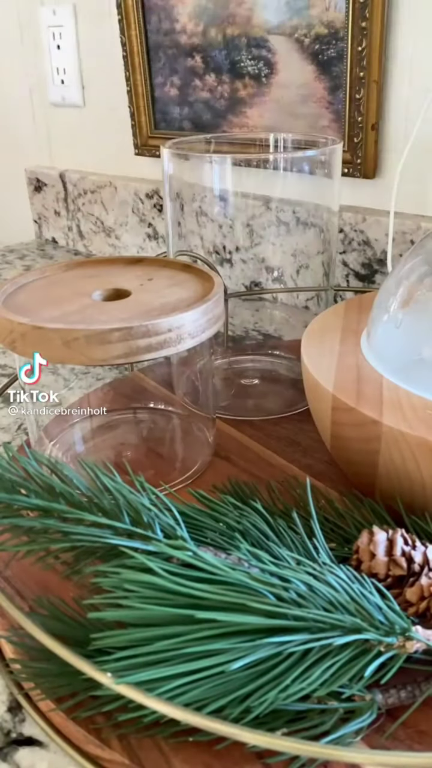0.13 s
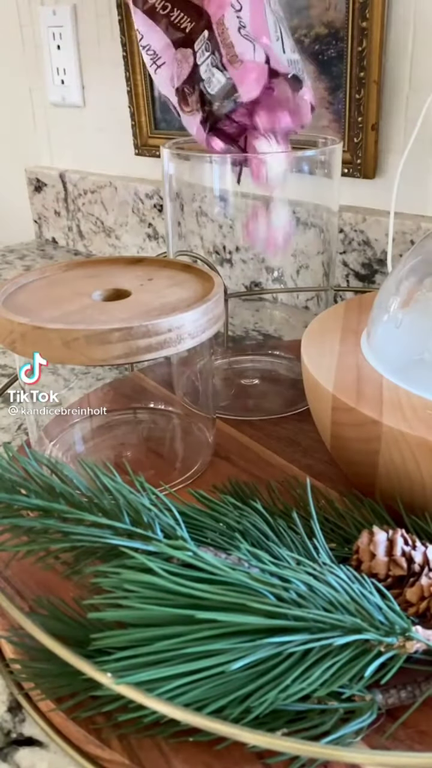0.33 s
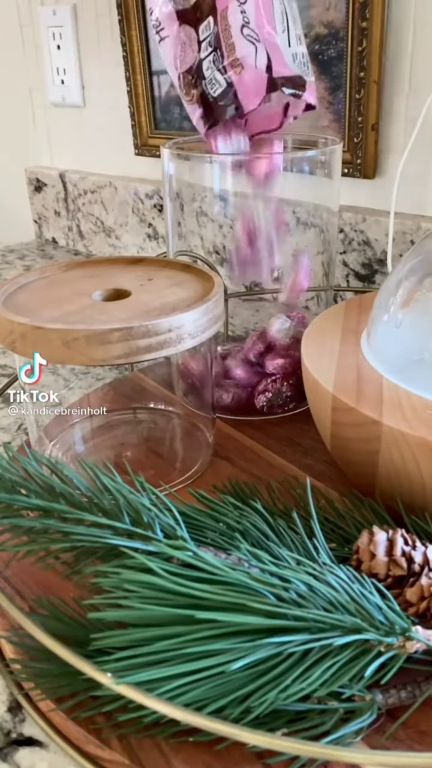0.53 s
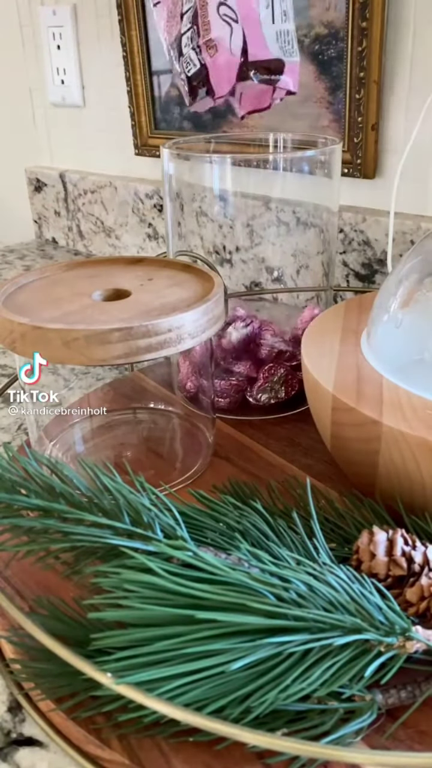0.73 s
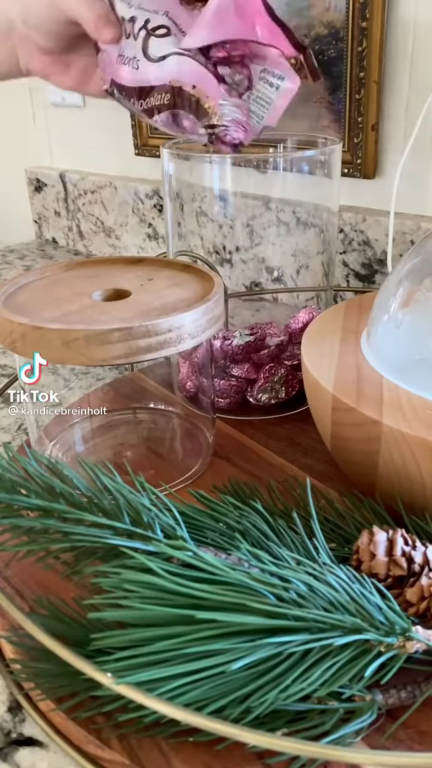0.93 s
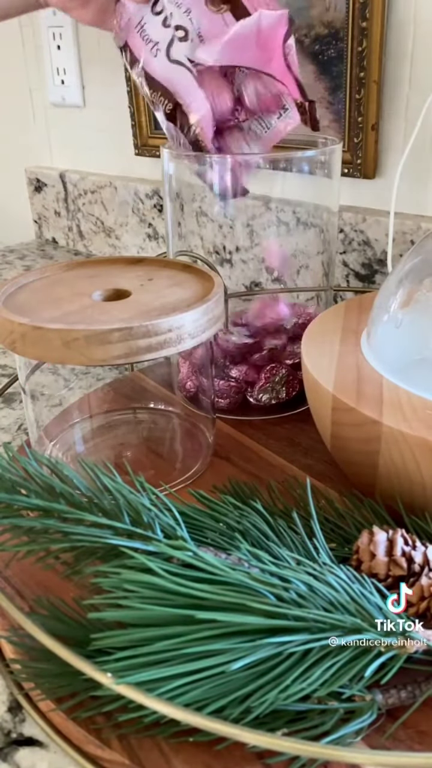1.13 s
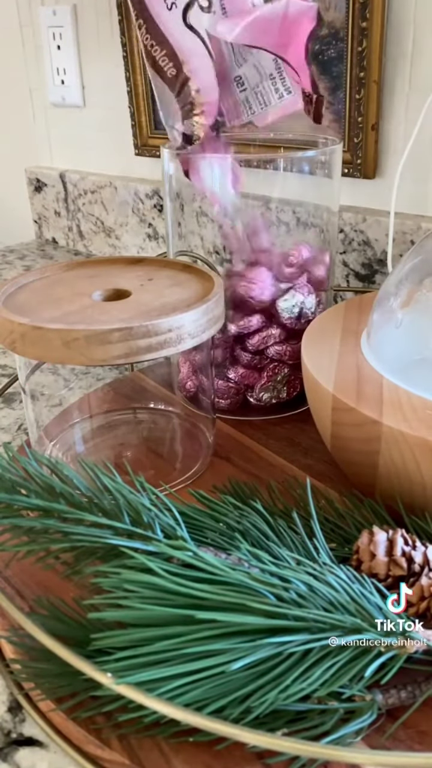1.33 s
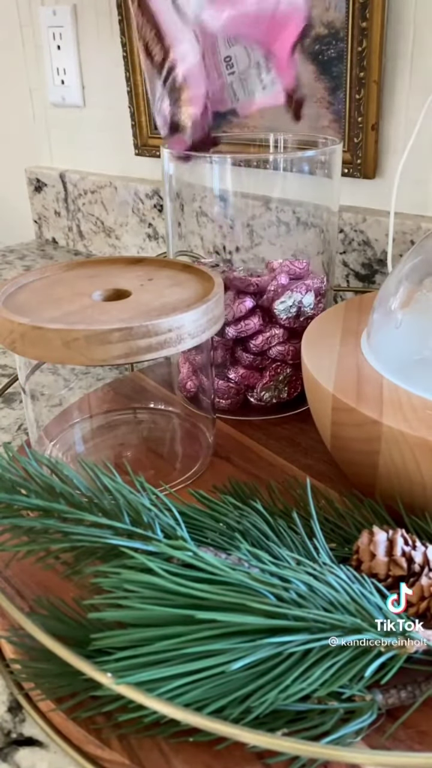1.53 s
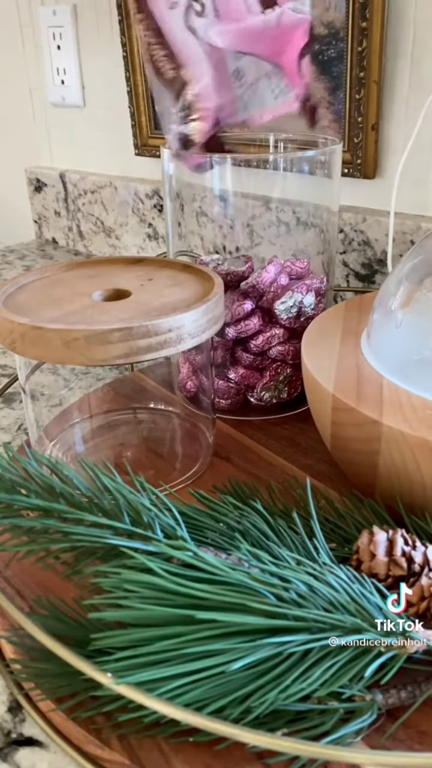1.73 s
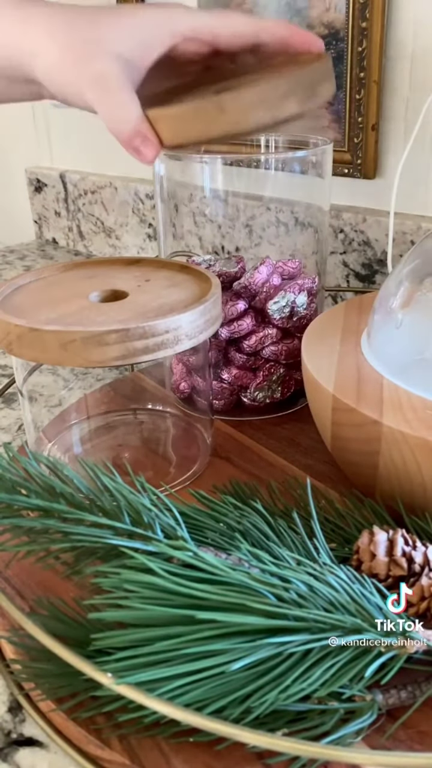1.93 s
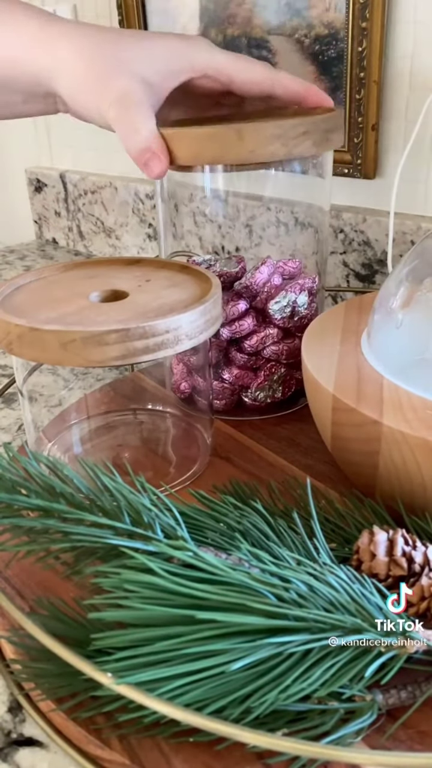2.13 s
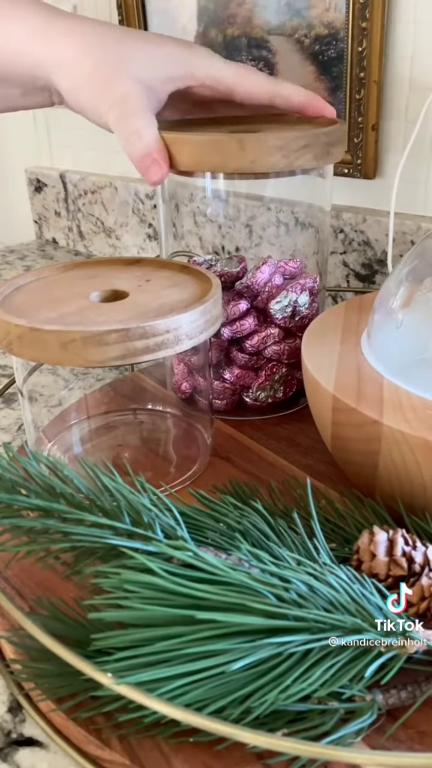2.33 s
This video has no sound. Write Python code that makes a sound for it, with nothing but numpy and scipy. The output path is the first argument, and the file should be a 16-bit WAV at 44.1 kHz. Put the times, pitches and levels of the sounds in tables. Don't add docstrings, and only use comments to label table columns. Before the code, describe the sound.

Foil-wrapped sweets pour in two bursts into a ringing glass jar, then a wooden lid knocks on

```python
import sys
import numpy as np
from scipy import signal
from scipy.fft import rfft, irfft
from scipy.io import wavfile
from scipy.ndimage import uniform_filter1d

SR = 44100
rng = np.random.default_rng(int(sys.argv[2]) if len(sys.argv) > 2 else 0)


def volts_from_decibels(level):
    exponent = np.asarray(level, float) / 20
    return 10 ** exponent


def persist_wave(psi):
    counts = np.round(np.clip(psi, -1, 1) * 32767).astype(np.int16)
    wavfile.write(sys.argv[1], SR, np.atleast_2d(counts).T)


N = 109544
T = np.arange(N) / SR

# t/s, level/dB
FLOW = [(.28, -57), (.34, -29), (.42, -31.5), (.55, -33.5), (.62, -41.5), (.7, -39.5), (.76, -55.5),
        (1.0, -44.5), (1.1, -38.5), (1.25, -34.5), (1.35, -47.5), (1.42, -64), (1.6, -51)]
# f/Hz, level/dB
CLATTER = [(150, -9), (500, 2.5), (2000, 1), (4500, -3), (8000, 0), (15500, -19.5)]
BAG_IN_S, POUR_CUT_S, BAG_OUT_S = 0.133, 0.868, 1.755
SNAP_RISE_S = 0.0012


def read(points, hz):
    f, value = np.transpose(points)
    return np.interp(np.log(hz + 1), np.log(f + 1), value)


def evened(x):
    return x / np.sqrt(np.mean(x ** 2) + 1e-20)


def curve(rows):
    s, db = np.transpose(rows)
    return volts_from_decibels(np.interp(T, s, db, -120, -120))


def colour(x, points):
    log_gain = np.log(volts_from_decibels(read(points, abs(np.fft.fftfreq(4096, 1 / SR)))))
    minimum_phase = np.exp(np.conj(signal.hilbert(log_gain)))
    return signal.oaconvolve(x, np.fft.ifft(minimum_phase).real[:2048])[:N]


def ring(x, hz, width):
    return signal.lfilter(*signal.iirpeak(min(hz, 0.45 * SR), hz / width, SR), x)


def lumps(size):
    once = uniform_filter1d(rng.standard_normal(N), size)
    return evened(uniform_filter1d(once, size))


def add(mix, s, sound):
    part = mix[round(s * SR):][:len(sound)]
    part += sound[:len(part)]


def clicks(per_s, spread_db):
    size = volts_from_decibels(spread_db * np.minimum(rng.exponential(1, N), 3.0))
    return evened(rng.choice([-1, 1], N) * size * (rng.random(N) < per_s / SR))


def grains(per_s, spread_db, lo_hz, hi_hz, turns):
    hits = abs(clicks(per_s, spread_db))
    kind = rng.integers(0, 24, N)
    decay = volts_from_decibels(-60 / (0.008 * SR))
    grit = rng.standard_normal(N)
    out = np.zeros(N)
    for k, hz in enumerate(np.geomspace(lo_hz, hi_hz, 24)):
        burst = signal.lfilter([1], [1, -decay], hits * (kind == k))
        out += ring(burst * np.roll(grit, k), hz, hz / turns)
    return out


def kitchen():
    # f/Hz, level/dB
    floor_spectrum = [(20, 1.5), (35, -4), (80, -19), (200, -31), (700, -33), (1500, -45.5), (5000, -56),
                      (15500, -60.5)]
    hum_hz, whine_hz, splice_s = 117.2, 4100, 2.4525

    hz = np.fft.rfftfreq(N, 1 / SR)
    shape = volts_from_decibels(read(floor_spectrum, hz)) * (hz > 18)
    rumble = evened(irfft(rfft(rng.standard_normal(N)) * shape, N))
    whine = evened(ring(rng.standard_normal(N), whine_hz, 60))
    steady = np.sqrt(2) * np.sin(2 * np.pi * hum_hz * T)
    hum = steady + 0.5 * evened(ring(rng.standard_normal(N), hum_hz, 12))
    age = T - splice_s
    step = volts_from_decibels(-32) * np.sign(-age) * np.exp(-abs(age) / 0.006) / 2
    return volts_from_decibels(-39) * rumble + volts_from_decibels(-50.5) * hum + volts_from_decibels(-76) * whine + step


def bag():
    # t/s, level/dB
    handling = [(.13, -42.5), (.21, -38.5), (.28, -42), (.5, -57.5), (.7, -51), (.79, -93), (.81, -61),
                (.96, -50.5), (1.06, -48.5), (1.27, -48), (1.5, -50.5), (1.61, -77), (1.64, -49),
                (1.752, -65)]
    # f/Hz, level/dB
    film = [(150, 2.5), (600, 9), (1500, 1), (4000, 2), (9000, -2.5), (15500, -1.5)]
    # t/s, level/dB, f/Hz
    snap_events = [(0.141, -14.5, 4070), (0.148, -12, 5640), (0.1638, -14, 2550), (0.202, -14, 3020),
                   (.207, -10, 9000), (0.2347, -10.5, 4900), (0.8065, -16, 5200), (0.849, -26, 5000),
                   (0.8743, -28, 5000), (0.9062, -16.5, 4050), (0.923, -18.5, 7100), (0.97, -15.5, 3570),
                   (1.099, -24, 8800), (1.411, -22, 4740), (1.426, -18.5, 2400), (1.441, -23.5, 9900),
                   (1.455, -19, 5000), (1.475, -19.5, 4000), (1.494, -23, 11000), (1.498, -23.5, 2980),
                   (1.509, -13.5, 9000), (1.5387, -24.5, 12000), (1.5733, -31.5, 4650),
                   (1.616, -32.5, 1990), (1.6341, -20.5, 6010), (1.6417, -16.5, 2900), (1.65, -21.5, 7100),
                   (1.6736, -26, 3820), (1.703, -22.5, 8000), (1.708, -15, 2520), (1.726, -33.5, 4760),
                   (1.849, -44, 3130), (1.918, -43, 5970), (1.934, -40, 3000), (2.0522, -35.5, 3300),
                   (2.147, -24.5, 13000)]
    # t/s, level/dB
    slumps = [
        (1.096, -20.5),
        (1.329, -27),
        (1.469, -36),
        (1.469, -32.5),
        (1.539, -30),
        (1.559, -31),
        (1.574, -48),
        (1.636, -27.5),
        (1.676, -44),
    ]
    crinkles_per_s, crinkle_db, hiss_db, snap_t60 = 720, 4, 8.5, 0.011

    fine = evened(colour(grains(crinkles_per_s, 2.8, 270, 14000, turns=4.7), film))
    hiss = evened(colour(rng.standard_normal(N), film))
    crinkle = volts_from_decibels(crinkle_db) * fine + volts_from_decibels(hiss_db) * hiss
    crinkle *= curve(handling) * volts_from_decibels(3.2 * lumps(size=250))

    t = np.arange(600) / SR
    snaps, thumps = np.zeros((2, N))
    for s, db, hz in snap_events:
        burst = rng.standard_normal(600) * volts_from_decibels(-60 * t / snap_t60)
        burst *= np.minimum(t / SNAP_RISE_S, 1) ** 2
        add(snaps, s, volts_from_decibels(db) * (0.45 * burst + 2 * ring(burst, hz, hz / 2.5)))
    for s, db in slumps:
        add(thumps, s, volts_from_decibels(db + 9) * np.hanning(90))
    return crinkle + colour(snaps, film) + ring(ring(thumps, 280, 200), 320, 500)


def heap():
    # f/Hz, width/Hz, level/dB
    air_modes = [(260, 100, -2.5), (569, 100, 3), (796, 67, 2)]
    clatter_db, air_db = 5.5, 4.5

    knocks = evened(grains(1200, 2.8, 250, 15000, turns=4.5))
    knocks = colour(knocks + 0.66 * rng.standard_normal(N), CLATTER)
    knocks = evened(knocks * volts_from_decibels(3.7 * lumps(size=150)))
    push = clicks(430, 0.43)
    air = evened(sum(volts_from_decibels(db) * ring(push, hz, width) for hz, width, db in air_modes))
    return curve(FLOW) * (volts_from_decibels(clatter_db) * knocks + volts_from_decibels(air_db) * air)


def glass(hits, families):
    pair_split, high_pair_db, low_pair_db = 0.006, -8, -15
    quick_db, quick_t60 = 2, 0.026
    scatter_db = 3.2
    rub_db, full_flow_db = 4.5, -27
    rise_s, cushion_s = 0.0008, 0.0025

    rows = np.array(hits)
    last = np.clip(np.searchsorted(rows[:, 0], T) - 1, 0, None)
    age = np.maximum(T - rows[last, 0], 0)
    busy = np.minimum(curve(FLOW) / volts_from_decibels(full_flow_db), 1)
    out = np.zeros(N)
    for level_db, modes in zip(rows[last, 1:].T, families):
        for k, (hz, db, t60) in enumerate(modes):
            phase, twin_phase, luck = rng.random((len(rows), 3))[last].T
            high = hz > 4000
            twin = np.sin(2 * np.pi * (hz * (1 + pair_split) * T + twin_phase))
            tone = np.sin(2 * np.pi * (hz * T + phase * high))
            tone += volts_from_decibels(high_pair_db if high else low_pair_db) * twin
            fade = volts_from_decibels(-60 * age / t60) + high * volts_from_decibels(quick_db - 60 * age / quick_t60)
            scatter = (k > 0) * scatter_db * (2 * luck - 2) * 2
            rub = rub_db * busy * lumps(size=200)
            out += volts_from_decibels(db + level_db + scatter + rub) * fade * tone
    tick = volts_from_decibels(-8 + rows[last, 1] - 60 * age / 0.026) * rng.standard_normal(N)
    onset = np.minimum(age / (rise_s + cushion_s * busy ** 2), 1)
    return (out + colour(tick, CLATTER)) * onset


def jar():
    # t/s, third ring mode level/dB, first mode level/dB, second mode level/dB,
    # upright modes level/dB
    first_pour = [(0.2897, -12.5, -3, -21, -33), (0.3271, -1.5, -21, -14.5, -7.5),
                  (0.341, -17.5, -8.5, -17.5, -15), (0.3647, -2.5, -21.5, -19, -0.5),
                  (0.4094, -14.5, -21.5, -25.5, -7), (0.4572, -21.5, -29.5, -26.5, -15),
                  (0.468, -10, -19, -23, -5), (0.516, -20.5, -21, -19.5, -13.5),
                  (0.5267, -4, -11, -20, -7.5), (0.5738, -8, -27, -23, -8), (0.605, -26, -9.5, -19.5, -18),
                  (0.6572, -2, -35, -29.5, -4.5), (0.6924, -13, -24.5, -27.5, -24.5)]
    second_pour = [(1.0045, -4.5, -30.5, -25.5, -7.5), (1.04, -24, -22, -31, -37),
                   (1.1125, -20, -15, -39, -30.5), (1.1445, -13, -19, -23, -34),
                   (1.163, -15, -9.5, -19.5, -18), (1.2005, -11.5, -22.5, -26.5, -12.5),
                   (1.2215, -16, -14.5, -30.5, -27.5), (1.2435, -10, -17.5, -16.5, -15),
                   (1.2685, -8, -11.5, -29, -12.5), (1.2885, -17.5, -13.5, -17.5, -19),
                   (1.304, -20, -23.5, -28, -18.5), (1.3375, -12.5, -15.5, -22, -17),
                   (1.3485, -6, -29, -23, -6), (1.3585, -25.5, -48.5, -26.5, -40.5),
                   (1.39, -36.5, -46, -35.5, -32.5), (1.4545, -40.5, -32.5, -37.5, -32.5),
                   (1.5395, -59, -29.5, -52.5, -52), (1.573, -64, -49, -75, -69)]
    # f/Hz, level/dB, t60/s
    wall_modes = [
        [(6102, -5.5, 0.2), (9770, -14.5, 0.27), (14290, -24, .09)],
        [(1196.6, -4, 0.14)],
        [(3240, 1, 0.86)],
        [(7490, -7.5, 0.12), (8000, -6.5, 0.037)],
    ]
    # t/s, level/dB
    base_hits = [
        (0.366, 3.5),
        (0.3814, -10),
        (0.4103, -15),
        (0.4174, -10.5),
        (0.437, -16.5),
        (0.4459, -11.5),
        (0.4583, -4.5),
        (0.4698, -5),
        (0.4975, -12),
        (0.5301, -11.5),
    ]
    # f/Hz, level/dB, t60/s
    base_modes = [
        [(4770, -5.5, 0.061), (4900, -0.5, 0.057), (4610, -16, 0.045), (5320, -13, 0.041)],
    ]
    # t/s, level/dB
    pings = [(0.3267, -19.5), (0.3646, -11), (0.4075, -23), (0.4713, -16), (0.5247, -17), (0.576, -26.5),
             (0.607, -26), (0.655, -14), (1.004, -16.5), (1.146, -22.5), (1.1974, -20.5), (1.2214, -21.5),
             (1.245, -17), (1.269, -6), (1.3034, -23.5), (1.3356, -20.5), (1.3467, -12.5)]
    # f/Hz, level/dB, t60/s
    rim_modes = [
        [(11520, -10.5, .045), (12200, -9, .06), (10840, -10, 0.067), (13800, -11.5, .04), (14700, -16, .035)],
    ]

    taps = clicks(250, 2.5) * curve(FLOW) * volts_from_decibels(0.5)
    rattle = np.zeros(N)
    for hz, db, t60 in sum(wall_modes, []):
        rattle += volts_from_decibels(db) * ring(taps * rng.standard_normal(N), hz, 1.3 / t60)
    wall = glass(first_pour, wall_modes) * (T < POUR_CUT_S) + glass(second_pour, wall_modes)
    return wall + glass(base_hits, base_modes) + glass(pings, rim_modes) + rattle


def clacks():
    # t/s, level/dB, f/Hz
    landings = [(0.339, -2, 2200), (0.363, -11, 3000), (0.381, -8.5, 2300), (0.395, -0.5, 5000),
                (0.409, -10.5, 7900), (0.4149, -6, 2040), (0.443, -8, 2090), (0.459, -4, 7300),
                (0.469, -10.5, 8500), (0.491, -11, 2000), (.517, -13.5, 2400), (0.5315, -1, 2200),
                (0.531, -4.5, 4000), (.610, -11, 4900), (0.638, -11, 5000), (1.098, -26.5, 3820),
                (1.1114, -25.5, 2000), (1.1655, -16, 2500), (1.198, -11.5, 6500), (1.203, -21.5, 2330),
                (1.207, -13.5, 9000), (1.2202, -8, 1500), (1.226, -18.5, 2100), (1.2411, -10.5, 2000),
                (1.252, -13.5, 6000), (1.304, -20.5, 5500), (1.327, -21.5, 1960)]
    clack_t60, turns, wide_db = 0.012, 3.5, -13.5

    out, t = np.zeros(N), np.arange(900) / SR
    for s, db, hz in landings:
        burst = rng.standard_normal(900) * volts_from_decibels(-60 * t / clack_t60)
        burst *= np.minimum(t / SNAP_RISE_S, 1)
        body = ring(burst, hz, hz / turns)
        add(out, s, volts_from_decibels(db) * (body / abs(body).max() + volts_from_decibels(wide_db) * burst))
    return out


def lid():
    # t/s, body level/dB, crack level/dB, thump level/dB
    lid_hits = [
        (1.9692, -25.5, -45.5, -20),
        (2.1016, -32, -20, -35),
        (2.1465, -25.5, -14, -17),
        (2.283, -48.5, -55, -23.5),
    ]
    # f/Hz, level/dB, t60/s
    wood = [(279, -7, 0.076), (353, -3, 0.098), (577.3, -0.5, 0.15), (671, 2.5, 0.062), (907, -2, 0.035),
            (1033, -7, .05), (1316, -4.5, 0.042), (1593, -11.5, 0.069), (2090, -6, 0.059),
            (2270, -14.5, .04)]
    # f/Hz, level/dB
    crack_bands = [(1500, 19.5), (2200, 15), (3200, 1.5), (4200, -3.5)]
    scrape_from_s, scrape_to_s, scrape_db = 2.07, 2.19, -47
    grain_db = 4

    out, t = np.zeros(N), np.arange(9000) / SR
    for s, body_db, crack_db, thump_db in lid_hits:
        knock = volts_from_decibels(thump_db - 60 * t / 0.027) * np.sin(2 * np.pi * 220 * t)
        for hz, db, t60 in wood:
            grain = evened(uniform_filter1d(rng.standard_normal(9000), size=250))
            fade = volts_from_decibels(body_db + db - 60 * t / t60 + grain_db * grain)
            knock += fade * np.sin(2 * np.pi * hz * rng.uniform(0.97, 1.03) * t)
        blow = rng.standard_normal(9000) * (volts_from_decibels(-60 * t / 0.013) + volts_from_decibels(-14 - 60 * t / 0.063))
        crack = np.zeros(9000)
        for hz, db in crack_bands:
            crack += volts_from_decibels(crack_db - 1.0 + db) * ring(ring(blow, hz, hz / 4.15), 1400, 3600)
        add(out, s, knock * np.minimum(t / 0.002, 1) + crack)

    u = (T - scrape_from_s) / (scrape_to_s - scrape_from_s)
    stroke = np.sin(np.pi * np.clip(u, 0, 1)) + 0.34 * np.exp(-((u - 2) * 10) ** 2)
    return out + volts_from_decibels(scrape_db) * stroke * evened(grains(2800, 3.5, 3500, 15000, turns=1.5))


def room(x):
    # f/Hz, t60/s
    room_t60 = [(300, 0.4), (2000, 0.21), (4500, 0.13), (12000, 0.13)]
    taps = np.zeros(SR // 2)
    at = np.arange(200, SR // 2 - 20, 20)
    taps[at + rng.integers(0, 20, len(at))] = rng.choice([-1.0, 1.0], len(at))
    hz, t, z = signal.stft(taps, SR, nperseg=256)
    decay = volts_from_decibels(-60 * t / read(room_t60, hz)[:, None])
    tail = signal.istft(z * decay, SR, nperseg=256)[1]
    return signal.fftconvolve(x, tail / np.linalg.norm(tail))[:N]


def scene():
    things = jar() + clacks() + heap() + bag() + lid()
    pouring = (T > BAG_IN_S) & (T < BAG_OUT_S)
    early, late = things * pouring, things * (T >= BAG_OUT_S)
    echoes = room(early) * pouring + room(late)
    mix = early + late + volts_from_decibels(-12) * echoes + kitchen()
    return np.array([mix, mix])


def top_cut(x):
    return signal.sosfilt(signal.butter(12, 15670, fs=SR, output="sos"), x)


def record(dry):
    smear_times = [.2, .367, .47, .64, .81, .88, .97, 1.5, 1.64, 1.685, 1.72, 2.1, 2.17]
    low_pass = signal.firwin(255, 15700, fs=SR)
    x = signal.oaconvolve(np.clip(dry, -1, 1), low_pass[None], "same")
    treble = signal.sosfilt(signal.butter(8, 4700, "high", fs=SR, output="sos"), x[0])
    moments = sum(np.exp(-((T - s) / 0.01) ** 2) for s in smear_times)
    smear = volts_from_decibels(-13) * treble * moments * lumps(size=30)
    mix = np.clip(x + [smear, -smear], -1, 1)
    return top_cut(mix)


dry = scene()
out = record(dry)
persist_wave(out)
```